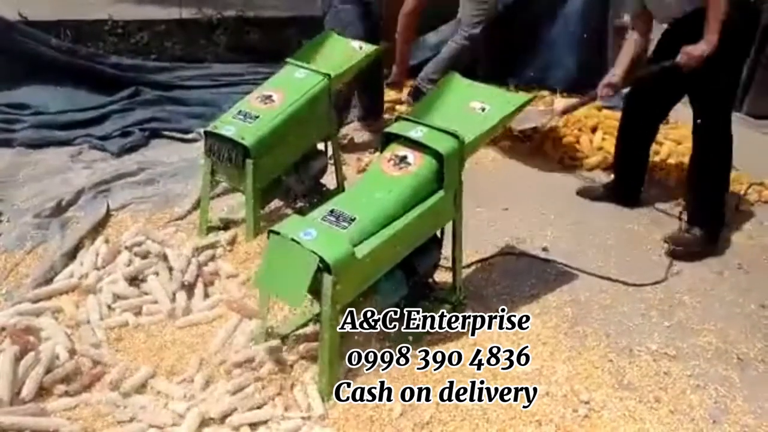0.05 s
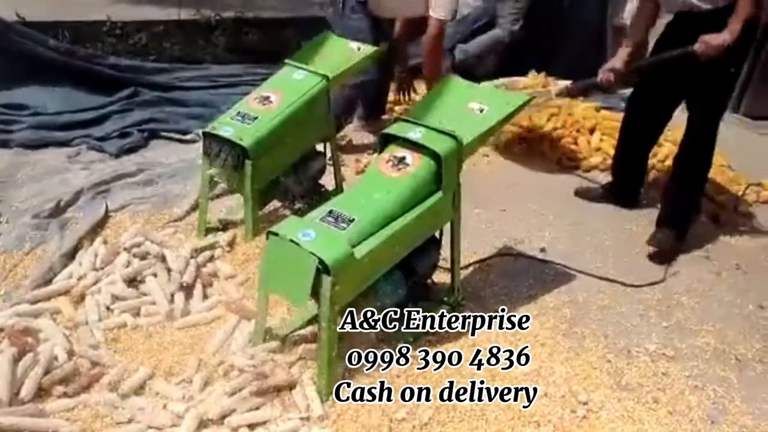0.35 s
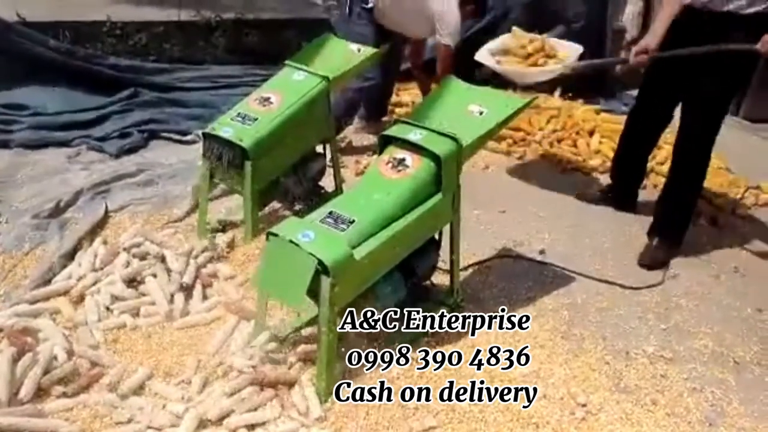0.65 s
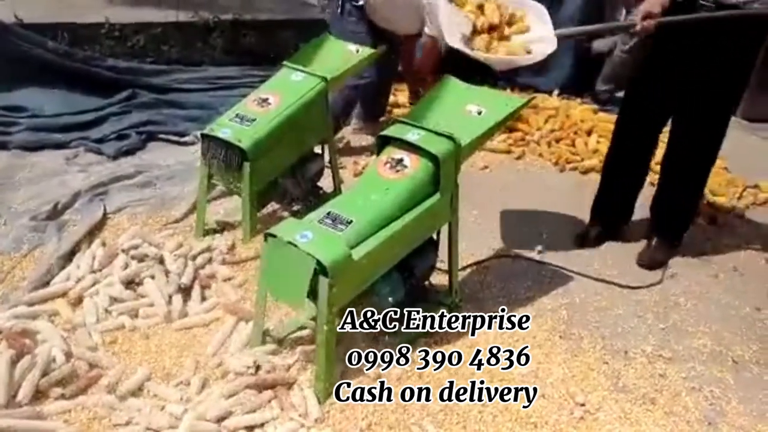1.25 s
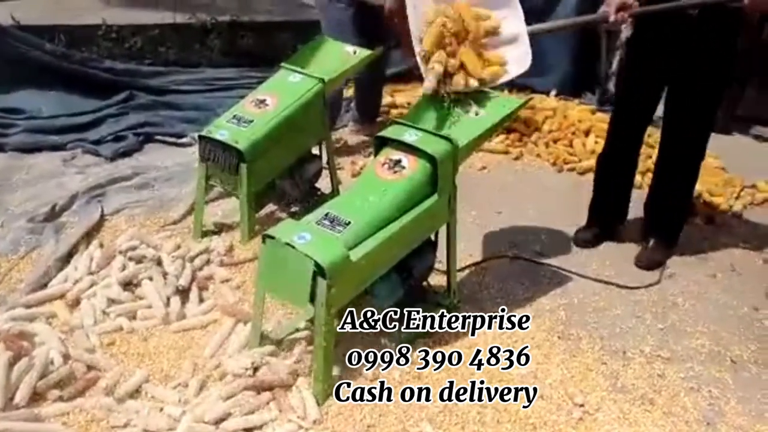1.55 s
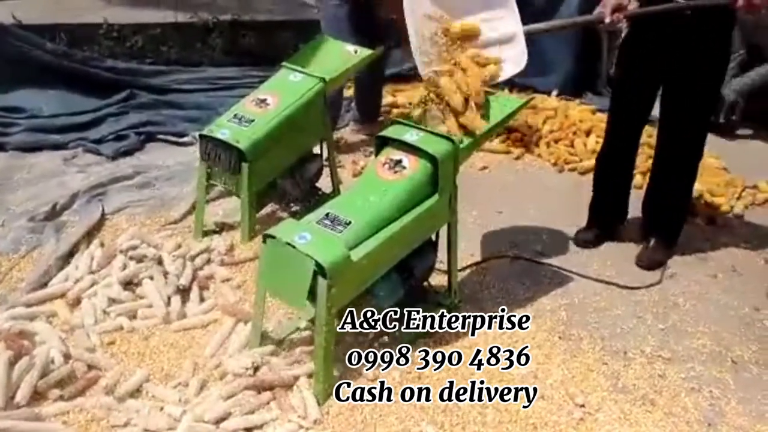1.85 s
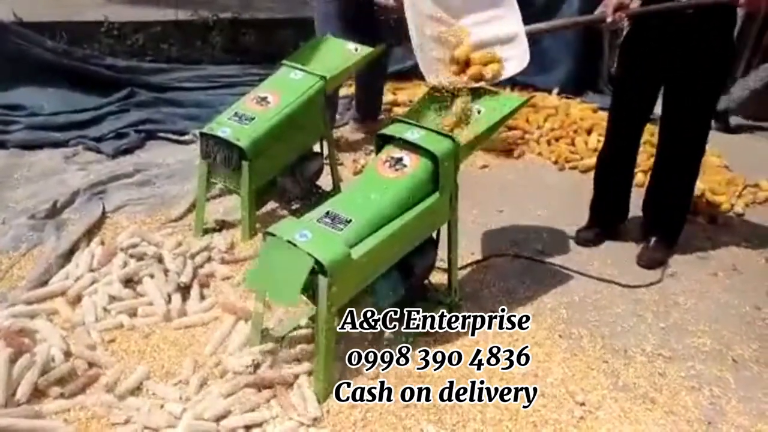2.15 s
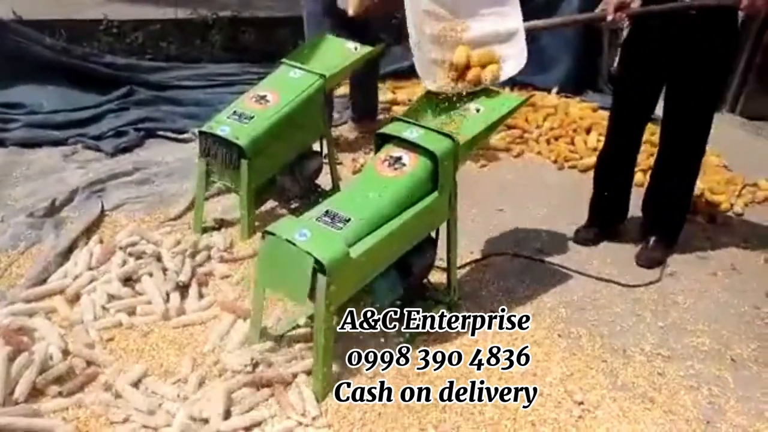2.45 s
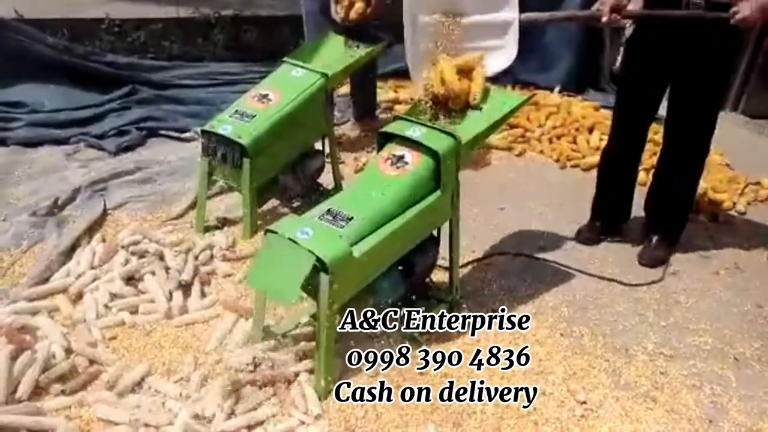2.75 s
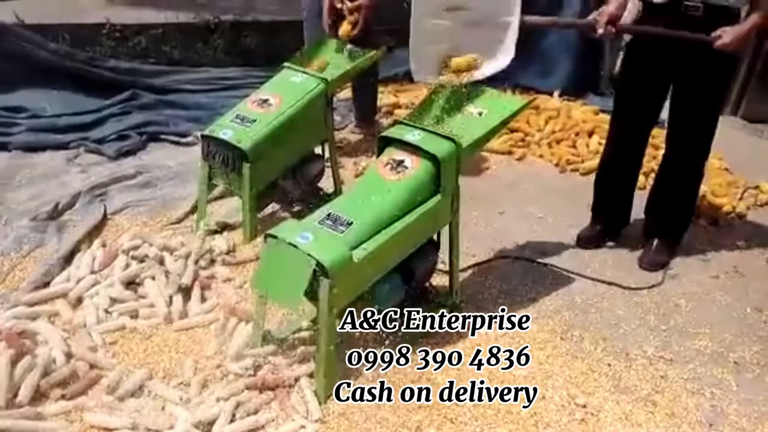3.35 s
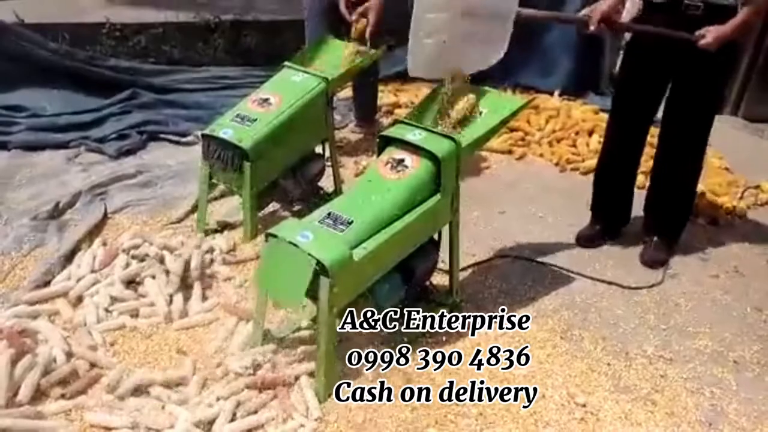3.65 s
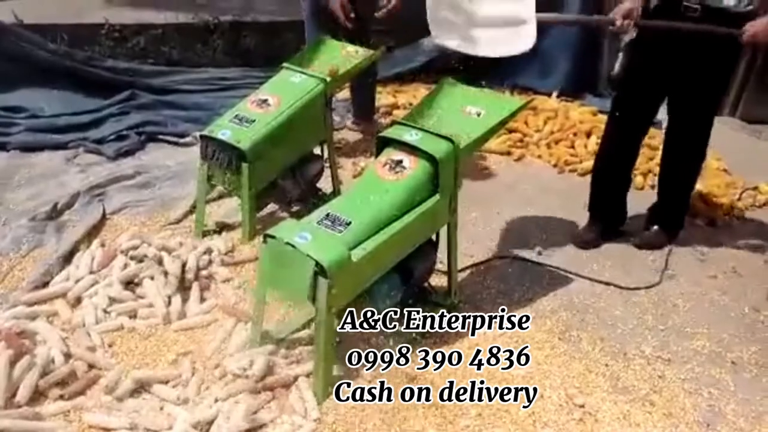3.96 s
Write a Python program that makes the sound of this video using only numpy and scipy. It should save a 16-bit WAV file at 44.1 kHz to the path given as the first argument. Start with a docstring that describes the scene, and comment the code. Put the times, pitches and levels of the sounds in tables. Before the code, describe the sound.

An electric corn sheller runs throughout, outdoors and mostly on the right, with cobs clattering in its metal housing and kernels spraying in a dense rattle. Sharp ringing knocks come irregularly, the loudest at about 2.7, 2.8 and 3 seconds. Low drumming and a faint hum swell from about 2.8 to 3.6 seconds, then the clatter eases while the kernels keep rattling.

```python
"""In a yard, an electric corn sheller runs while cobs are tipped into its hopper.
The rotor hums and drums the cobs round a sheet-metal housing. Their impacts excite the modes of
housing, cover and drum, heard as clatter, hard ringing and thuds, with now and then a loud knock.
Loose kernels strike the metal in a dense spray, their many brief rings adding up to a rattle.
The machine is heard mostly on the right, over a faint low background."""
import sys
import numpy as np
from scipy import signal
from scipy.fft import rfft, irfft
from scipy.io import wavfile

SR = 44100
rng = np.random.default_rng(int(sys.argv[2]) if len(sys.argv) > 2 else 0)


def file_out(sig):
    """Save sig as 16-bit WAV at sys.argv[1]."""
    # one column per channel
    cols = np.atleast_2d(sig).T
    # limit, then scale
    lim = np.clip(cols, -1, 1)
    pcm = np.round(lim * 32767).astype(np.int16)
    wavfile.write(sys.argv[1], SR, pcm)


N = 176400
TIME = np.arange(N) / SR
FREQS = np.maximum(np.arange(N // 2 + 1) * SR / N, 1)


def from_db(db):
    """Amplitude ratio: a factor of ten for every 20 dB."""
    return 10 ** (np.asarray(db) / 20)


def rms_one(x):
    """Normalisation to unit mean power."""
    return x / np.sqrt(np.mean(x ** 2) + 1e-20)


def in_time(rows):
    """Linear interpolation of a curve at every sample."""
    return np.interp(TIME, *np.transpose(rows))


def at_hz(points):
    """Interpolation of a curve along a logarithmic frequency axis."""
    hz, value = np.transpose(points)
    return np.interp(np.log(FREQS), np.log(hz), value)


def colour(x, spectrum):
    """Zero-phase filtering by a spectral envelope; unit rms."""
    return rms_one(irfft(rfft(x) * from_db(at_hz(spectrum)), N))


def drift(corner_hz):
    """Low-passed noise gives a slow random fluctuation; unit rms."""
    return rms_one(irfft(rfft(rng.standard_normal(N)) / (1 + (FREQS / corner_hz) ** 2), N))


def impacts(per_s, spread_db=0):
    """Shot noise: two independent impulse trains, for the direct and the scattered sound."""
    sizes = from_db(spread_db * np.minimum(rng.exponential(1, (2, N)), 2.5))
    signs = rng.choice([-1, 1], (2, N))
    return rms_one(sizes * signs * (rng.random((2, N)) < per_s / SR))


def resonate(force, modes, patchy_db=0):
    """Modal superposition: damped resonators of alternating sign, their drive wandering by patchy_db."""
    out = 0
    for k, (hz, width, db) in enumerate(modes):
        radius = np.exp(-np.pi * width / SR)
        wander_db = patchy_db * drift(5.9) if patchy_db else 0
        gain = (-1) ** k * from_db(db + wander_db) * (1 - radius ** 2) / 2
        feedback = [1, -2 * radius * np.cos(2 * np.pi * hz / SR), radius ** 2]
        out = out + signal.lfilter([1, 0, -1], feedback, gain * force)
    return rms_one(out)


def patter(per_s, spread_db, ring_s, patchy_db, edges_hz):
    """Convolution: uneven showers of impacts excite spots of sheet metal, each ringing in its own band."""
    t = np.arange(SR // 10) / SR
    out = 0
    for low, high in zip(edges_hz, edges_hz[1:]):
        ring = rng.standard_normal((2, len(t))) * from_db(-60 * t / ring_s)
        phase = np.angle(rfft(ring, 2 * len(t)))
        ring = irfft(np.exp(1j * phase))[:, :len(t)]   # dense modes: an even spectrum
        ring = signal.sosfilt(signal.butter(2, (low, high), "band", fs=SR, output="sos"), ring)
        ring = ring * np.sqrt(high - low) / ring.std(axis=1, keepdims=True)
        hits = impacts(per_s / len(edges_hz), spread_db) * from_db(patchy_db * drift(32))
        out = out + signal.oaconvolve(hits, ring, axes=1)[:, :N]
    return rms_one(out)


# Envelope of the tumbling. Each row: time in seconds, relative level in dB.
TUMBLE_ENVELOPE = [(0.0, -24), (0.22, -19), (0.33, -20.5), (0.4, -21.5), (0.47, -23.5), (0.62, -23),
                   (0.7, -22), (0.78, -27.5), (0.9, -26), (0.96, -22.5), (1.12, -31), (1.17, -20),
                   (1.22, -25.5), (1.33, -19.5), (1.45, -25.5), (1.53, -21.5), (1.58, -25), (1.83, -20),
                   (1.92, -26), (2.07, -22.5), (2.15, -18), (2.29, -22), (2.43, -22.5), (2.52, -19.5),
                   (2.61, -22.5), (2.67, -17.5), (2.78, -20.5), (2.94, -19), (3.0, -19), (3.06, -18.5),
                   (3.18, -20), (3.3, -23), (3.37, -17), (3.5, -18.5), (3.57, -20), (3.7, -27), (3.92, -28),
                   (4.0, -26.5)]
# Spectrum of a cob striking metal. Each row: frequency in Hz, relative level in dB.
COB_SPECTRUM = [(100, -31), (280, -15.5), (390, -19), (480, -2), (700, -3), (980, -3.5), (1100, -4.5),
                (1250, -5.5), (1550, -6), (1750, -4), (2350, -9.5), (2750, -12.5), (4500, -12.5),
                (7500, -30)]
# Modes of the housing. Each row: frequency in Hz, bandwidth in Hz, relative gain in dB.
HOUSING_RESONANCES = [(480, 74, -14), (551, 25, -6.5), (619.5, 11.6, -1.5), (681, 16, 1), (746, 81, -6),
                      (877, 27, 0), (967, 16, 2.5), (1770, 140, -8), (2000, 70, -2), (2132, 14, 0),
                      (2350, 87, -4.5)]


def cobs():
    """Impact excitation: tumbling cobs clatter on the housing, favouring now one mode, now another."""
    hits_per_s, spread_db = 1500, 0.5
    effort = from_db(in_time(TUMBLE_ENVELOPE) + 0.72 * drift(21))
    clatter = patter(hits_per_s, spread_db, ring_s=0.059, patchy_db=0.84,
                     edges_hz=np.geomspace(250, 7600, 17))
    ringing = resonate(impacts(hits_per_s, spread_db), HOUSING_RESONANCES, patchy_db=2)
    return effort * (from_db(-4.5) * colour(clatter, COB_SPECTRUM) + from_db(-6) * ringing)


# Envelope of the cover's metallic ring. Each row: time in seconds, relative level in dB.
COVER_ENVELOPE = [(0.0, -29), (0.22, -28.5), (0.44, -27.5), (0.58, -27.5), (0.78, -30), (0.96, -30.5),
                  (1.12, -34), (1.16, -27.5), (1.21, -37), (1.25, -25.5), (1.29, -30.5), (1.34, -26),
                  (1.44, -33.5), (1.68, -29.5), (1.8, -24), (1.93, -35.5), (1.98, -27.5), (2.12, -26.5),
                  (2.38, -32.5), (2.5, -25.5), (2.62, -30), (2.78, -30), (2.95, -21), (3.0, -30.5),
                  (3.05, -20), (3.13, -24.5), (3.23, -25), (3.3, -31.5), (3.37, -25.5), (3.43, -30),
                  (3.49, -23.5), (3.57, -26.5), (3.64, -29), (3.71, -32), (4.0, -32.5)]
# Modes of the cover. Each row: frequency in Hz, bandwidth in Hz, relative gain in dB.
COVER_RESONANCES = [(1236, 60, 0), (1303, 45, 0), (1392, 57, 0.5), (1470, 44, -3), (1527, 60, -2),
                    (1863, 100, -8.5), (2340, 98, -9)]


def cover(rotor_angle):
    """Amplitude modulation: cobs driven against the cover ring it, pulsing with each turn of the rotor."""
    force = impacts(per_s=600, spread_db=0.5) * (1 + 0.27 * np.cos(rotor_angle))
    return from_db(1.5 + in_time(COVER_ENVELOPE)) * resonate(force, COVER_RESONANCES, patchy_db=2)


def pings(per_s=450, t60_s=0.09):
    """Free vibration: each single kernel leaves the metal ringing as a damped sine of its own pitch."""
    t = np.arange(SR // 8) / SR
    out = np.zeros((2, N + len(t)))
    decay = from_db(-60 * t / t60_s)
    for stream, when, pitch, size in rng.random((int(2 * per_s * N / SR), 4)):
        start, hz = int(when * N), 1200 + 6400 * pitch
        strength = from_db(-3.5 * np.log(size + 0.066))   # many weak, a few strong
        out[int(2 * stream), start:start + len(t)] += strength * decay * np.sin(2 * np.pi * hz * t)
    return rms_one(out[:, :N])


# Envelope of the kernel spray. Each row: time in seconds, relative level in dB.
SPRAY_ENVELOPE = [(0.0, -18.5), (0.28, -19.5), (0.32, -18), (0.54, -22.5), (0.59, -17.5), (0.65, -21.5),
                  (0.7, -19.5), (1.13, -22), (1.32, -20.5), (1.48, -22), (1.71, -20), (1.75, -21.5),
                  (1.89, -21.5), (1.93, -21.5), (2.17, -18.5), (2.45, -17.5), (2.49, -21), (2.54, -17),
                  (3.0, -20.5), (3.05, -18.5), (3.21, -19), (3.25, -19.5), (3.48, -20.5), (3.52, -17),
                  (3.55, -19.5), (3.86, -19), (3.92, -22.5), (4.0, -19)]
# Spectrum of kernels striking metal. Each row: frequency in Hz, relative level in dB.
SPRAY_SPECTRUM = [(500, -15), (1400, -13), (2300, -5), (2900, -9), (3700, -4.5), (4600, -5), (5200, -3),
                  (5750, -3.5), (6330, -0.5), (6900, -1.5), (7500, -4.5)]
# High modes of the struck spots. Each row: frequency in Hz, bandwidth in Hz, relative gain in dB.
SPOT_RESONANCES = [(3238, 80, 2.5), (3740, 110, -5), (5230, 250, -5), (6290, 99, 1), (6900, 160, -1.5)]


def kernels():
    """Incoherent summation: stripped kernels hail on the metal and their rings merge into a rattle."""
    flow = from_db(0.09 + in_time(SPRAY_ENVELOPE) + 0.52 * drift(24))
    rattle = patter(per_s=5000, spread_db=0, ring_s=0.051, patchy_db=1,
                    edges_hz=np.linspace(600, 7800, 19))
    spray = colour(rattle + from_db(-4) * pings(), SPRAY_SPECTRUM)
    hail = impacts(per_s=600)
    ringing = from_db(-11) * resonate(hail, SPOT_RESONANCES, patchy_db=1.5)
    return flow * (spray + ringing) + flurries(hail)


# Envelope of the drumming under load. Each row: time in seconds, relative level in dB.
LOAD_ENVELOPE = [(0.0, -40.5), (0.32, -36.5), (0.54, -40.5), (0.62, -31), (0.75, -45), (1.0, -38.5),
                 (1.12, -45.5), (1.33, -39.5), (1.45, -47), (1.65, -41.5), (1.71, -31.5), (1.84, -41),
                 (2.05, -40), (2.12, -28), (2.2, -40.5), (2.43, -38), (2.52, -33), (2.63, -37), (2.83, -25),
                 (2.97, -32.5), (3.1, -26), (3.16, -33.5), (3.23, -24), (3.42, -41), (3.46, -26.5),
                 (3.58, -29), (3.67, -35.5), (3.89, -46.5), (3.95, -38.5), (4.0, -46)]
# Low modes of the drum. Each row: frequency in Hz, bandwidth in Hz, relative gain in dB.
DRUM_RESONANCES = [(81, 18, -17), (162, 30, -8), (239, 20, 0.5), (300, 25, -3.5), (540, 105, -3),
                   (630, 52, -6)]
# Spectrum of the deep thuds. Each row: frequency in Hz, relative level in dB.
THUD_SPECTRUM = [(25, -31), (60, -21.5), (125, -10), (170, -8), (290, 1.5), (390, -11), (700, -32)]


def drum(rotor_angle):
    """Forced vibration: the humming rotor beats cobs against the drum, harder as the load grows."""
    load_db = in_time(LOAD_ENVELOPE)
    swing_db = load_db - load_db.mean()
    boom = from_db(load_db - 5) * resonate(impacts(per_s=500), DRUM_RESONANCES)
    thud_db = load_db.mean() - 10.5 + 0.33 * swing_db + 2.5 * drift(9)
    thuds = from_db(thud_db) * colour(impacts(per_s=240), THUD_SPECTRUM)
    return boom + thuds + rotor_hum(rotor_angle, swing_db)


# Partials of the hum. Each row: multiple of the turning rate, level at mean load in dB.
ROTOR_HARMONICS = [(2, -59.5), (3, -48)]


def rotor_hum(rotor_angle, swing_db):
    """Periodic forcing: harmonics of the turning rate waver slightly and swell with the load."""
    hum = sum(from_db(db + drift(5.4)) * np.sqrt(2) * np.sin(k * rotor_angle)
              for k, db in ROTOR_HARMONICS)
    return hum * from_db(swing_db) * [[1], [0]]   # direct sound only


# Spectrum of the background. Each row: frequency in Hz, relative level in dB.
BACKGROUND_SPECTRUM = [(20, 6), (45, 7), (75, -3.5), (170, 12.5), (400, -12), (2000, -39)]


def background():
    """Stationary noise, weighted to low frequencies, is heard as a faint rumble."""
    return from_db(-63.5) * colour(rng.standard_normal((2, N)), BACKGROUND_SPECTRUM)


# Cobs thrown hard against a panel. Each row: start in seconds, level in dB,
# pitch of the panel in Hz, time to decay by 60 dB in seconds.
HARD_BLOWS = [(.21, -20, 937, 0.24), (.395, -20, 878, 0.2), (0.934, -17, 1230, 0.071),
              (1.238, -19, 1540, 0.093), (1.316, -15.5, 1750, .06), (1.343, -18, 1343, 0.09),
              (1.515, -16.5, 692, 0.082), (1.797, -18.5, 975, 0.22), (1.804, -18, 1213, 0.25),
              (1.842, -20.5, 970, 0.19), (2.059, -19.5, 1270, 0.1), (2.105, -21.5, 1400, .2),
              (2.135, -14.5, 527, 0.12), (2.515, -15, 615, 0.064), (2.656, -15, 965, .08),
              (2.661, -7, 1237, 0.077), (2.662, -12, 1956, .05), (2.838, -7.5, 1374, 0.043),
              (2.944, -18, 1545, 0.2), (3.047, -10.5, 1370, 0.059), (3.235, -20, 1286, 0.094),
              (3.49, -20.5, 631, 0.3), (3.493, -20, 1400, 0.084)]


def knocks(rise_s=0.00043, crunch_fall_s=0.013):
    """Impulse response: a hard blow gives the damped clank of one panel and a quickly dying crunch."""
    clanks, crunch_envelope = 0, 0
    for start, db, hz, t60 in HARD_BLOWS:
        age = np.clip(TIME - start, 0, 1)
        blow = from_db(db) * (1 - np.exp(-age / rise_s))
        clanks = clanks + blow * from_db(-60 * age / t60) * np.sin(2 * np.pi * hz * age)
        crunch_envelope = crunch_envelope + blow * np.exp(-age / crunch_fall_s)
    crunch = from_db(-18.5) * crunch_envelope * colour(rng.standard_normal((2, N)), COB_SPECTRUM)
    return clanks * [[1], [0]] + crunch   # the clanks are direct sound only


# Flurries of kernels. Each row: time of the peak in seconds, level in dB, pitch in Hz.
KERNEL_FLURRIES = [(.32, -26.5, 6180), (1.71, -29.5, 4910), (2.39, -23, 5030), (2.45, -23, 5930),
                   (2.58, -25, 6490), (2.71, -29, 5720), (3.05, -29.5, 3470), (3.15, -23.5, 6180),
                   (3.51, -26, 5100), (3.7, -24, 6500)]


def flurries(hail, swell_s=0.04, bandwidth_hz=150):
    """Narrow-band resonance: a brief flurry of kernels sets one spot tinkling."""
    out = 0
    for peak, db, hz in KERNEL_FLURRIES:
        swell = from_db(db) * np.exp(-((TIME - peak) / swell_s) ** 2)
        out = out + swell * resonate(hail, [(hz, bandwidth_hz, 0)])
    return out


# Level difference between the sides. Each row: frequency in Hz, left relative to right in dB.
LEFT_GAIN = [(160, 0.5), (240, -3), (320, 3.5), (400, -15), (490, -5), (600, -16), (700, -9.5), (870, -14),
             (1000, -7), (1270, -8.5), (1500, -8), (2000, -11.5), (2400, -13.5), (2800, -9), (4200, -8),
             (5000, -9), (5700, -10), (6300, -22), (7000, -12.5), (7500, -22)]
# Likeness of the two sides. Each row: frequency in Hz, coherence from 0 to 1.
COHERENCE = [(50, 1), (200, 0.6), (600, 0.7), (1300, 0.46), (1900, 0.81), (2300, 0.16), (3300, .42),
             (4300, 0.091), (7000, .15)]
# Phase difference. Each row: frequency in Hz, phase of the left in radians (negative is a lag).
LEFT_PHASE_SHIFT = [(60, 0), (250, -0.5), (450, -1.5), (650, -4.5), (900, -5), (1400, -6.5), (2050, -7.5),
                    (3200, -5.5)]


def place(pair):
    """Binaural cues: the left hears the machine later and mostly weaker, mixed with scattered sound."""
    direct, scattered = rfft(pair)
    coherence = np.clip(at_hz(COHERENCE), 0, 1)
    delayed = direct * np.exp(1j * at_hz(LEFT_PHASE_SHIFT))
    left = coherence * delayed + np.sqrt(1 - coherence ** 2) * scattered
    return np.array([irfft(left * from_db(at_hz(LEFT_GAIN)), N), pair[0]])


def scene():
    """Superposition: the sounds of the machine and the background add, heard from one side."""
    rotor_hz = 80.26 * (1 + 0.0071 * drift(3.28))
    rotor_angle = 2 * np.pi * np.cumsum(rotor_hz) / SR
    return place(background() + cobs() + cover(rotor_angle) + knocks() + kernels() + drum(rotor_angle))


def record(dry):
    """Low-pass filtering: the top of the treble is cut steeply."""
    cutoff_hz, transition_hz = 7560, 80
    passband = np.clip((cutoff_hz - FREQS) / transition_hz + 0.5, 0, 1)
    return irfft(rfft(dry) * passband, N)


dry = scene()
out = record(dry)
file_out(out)
```